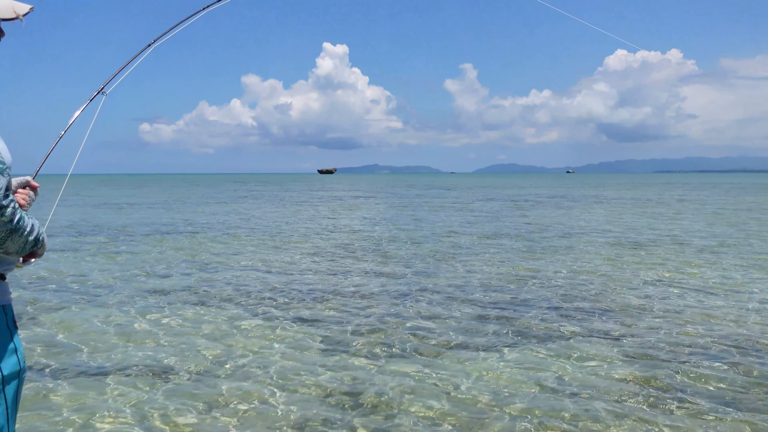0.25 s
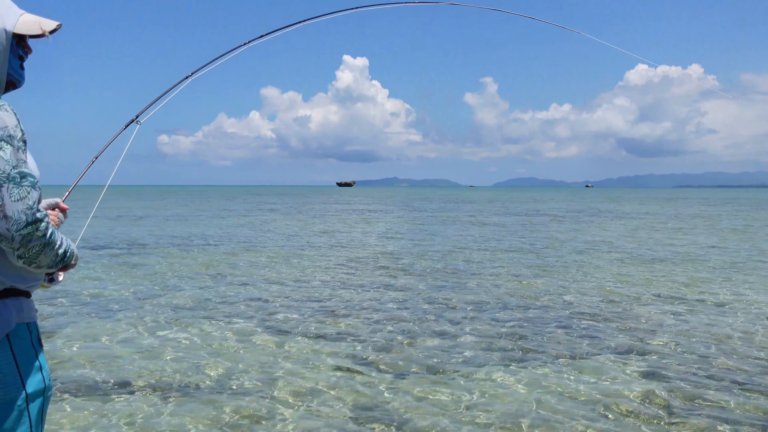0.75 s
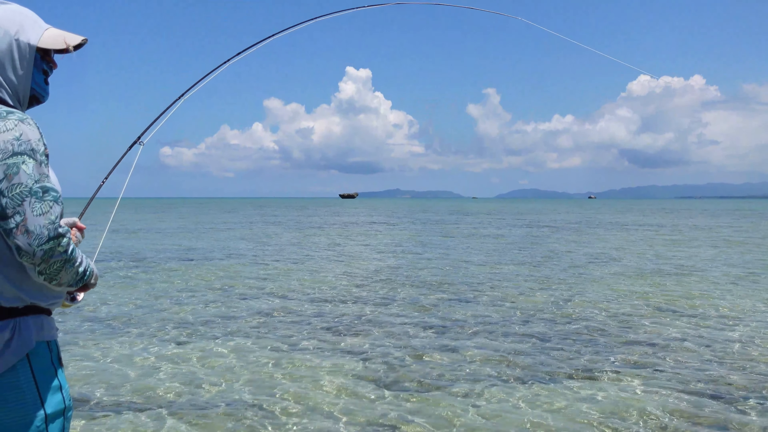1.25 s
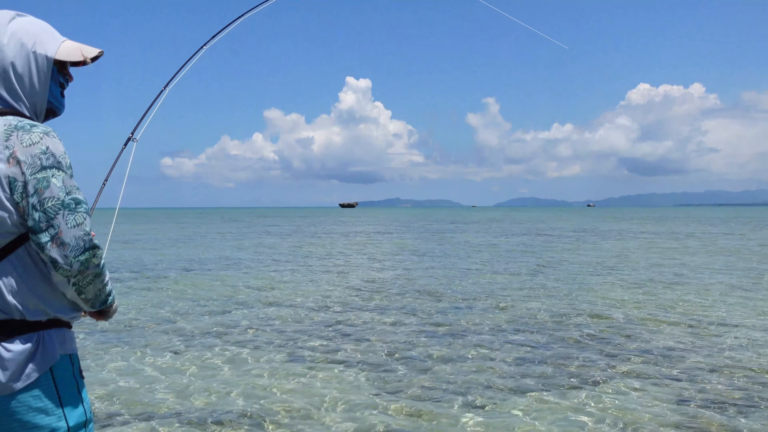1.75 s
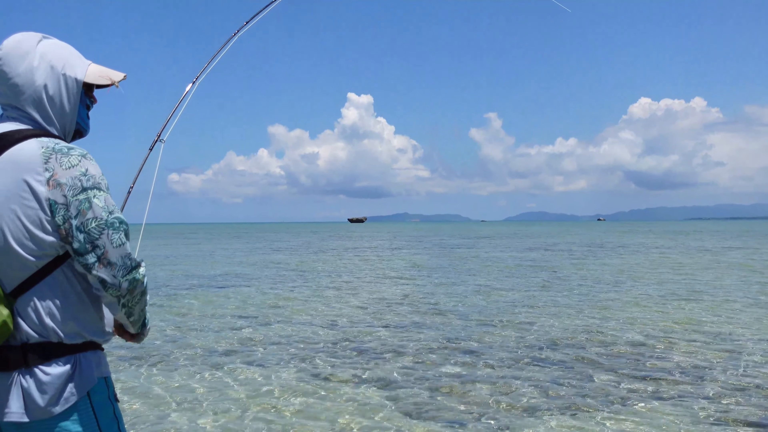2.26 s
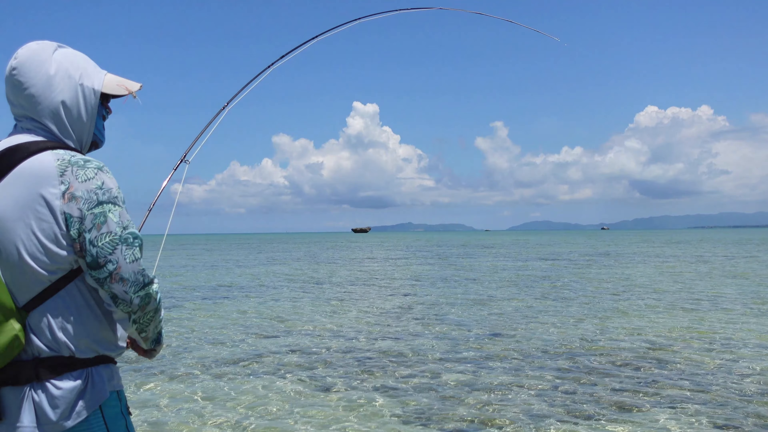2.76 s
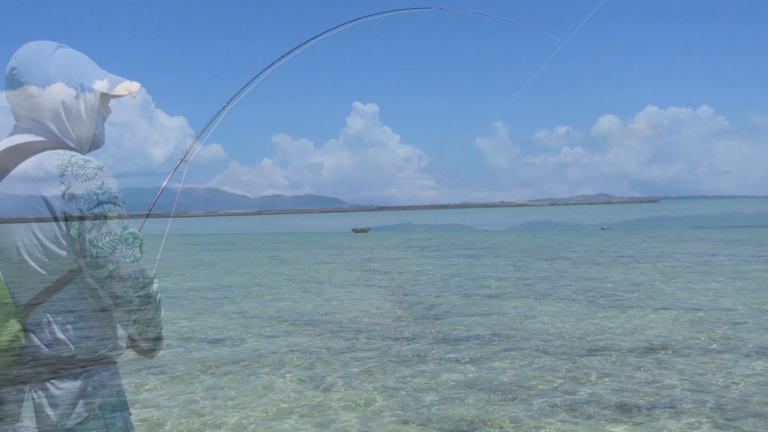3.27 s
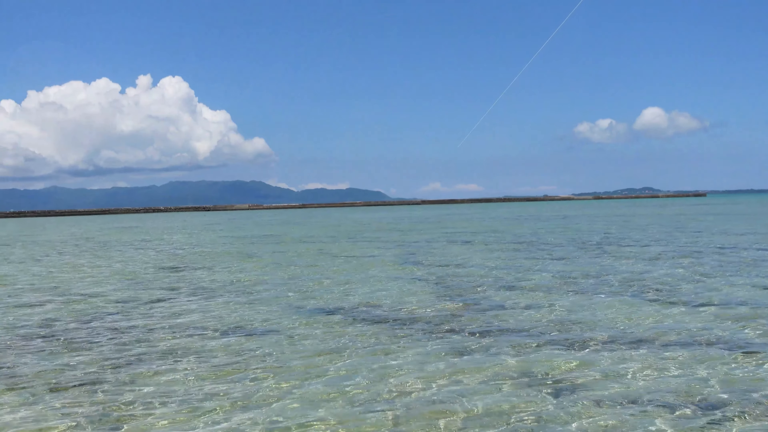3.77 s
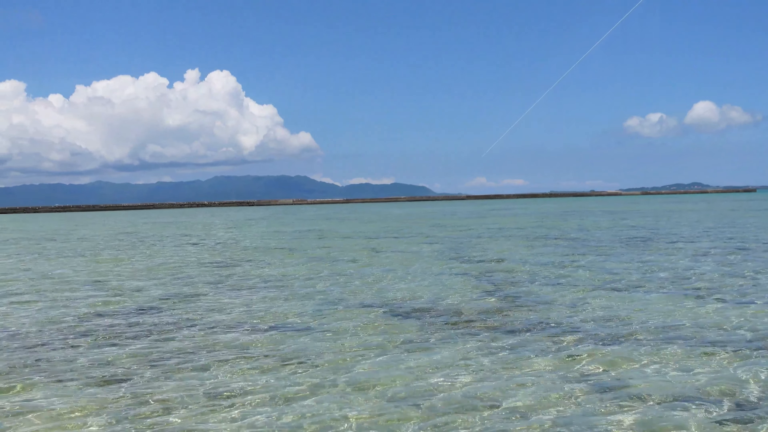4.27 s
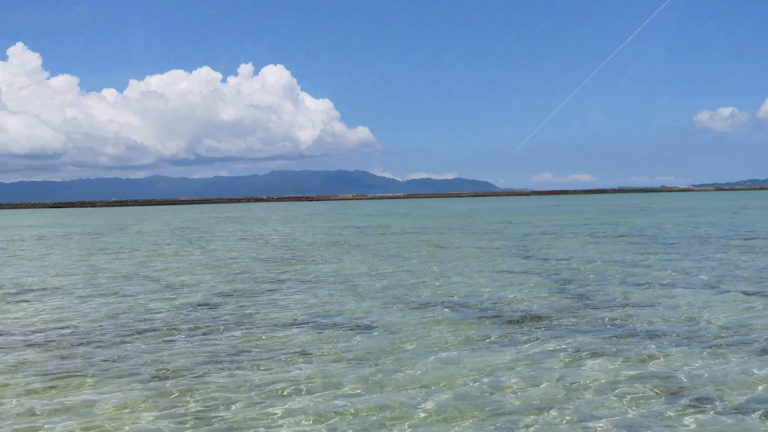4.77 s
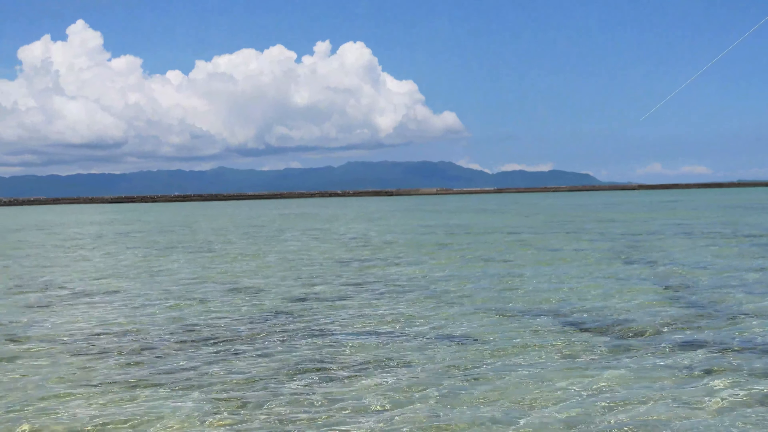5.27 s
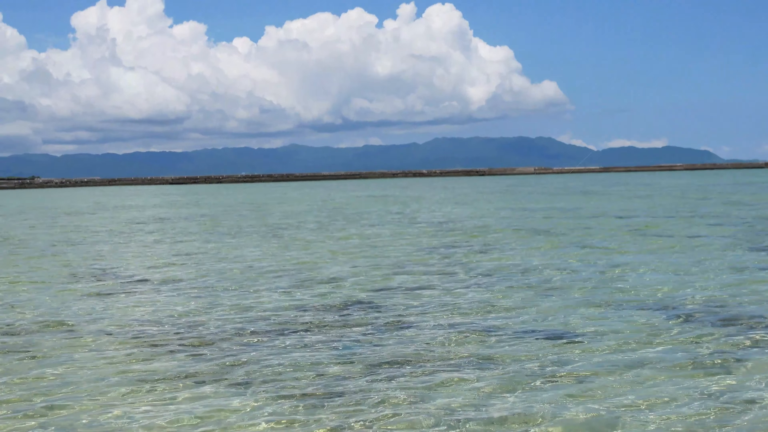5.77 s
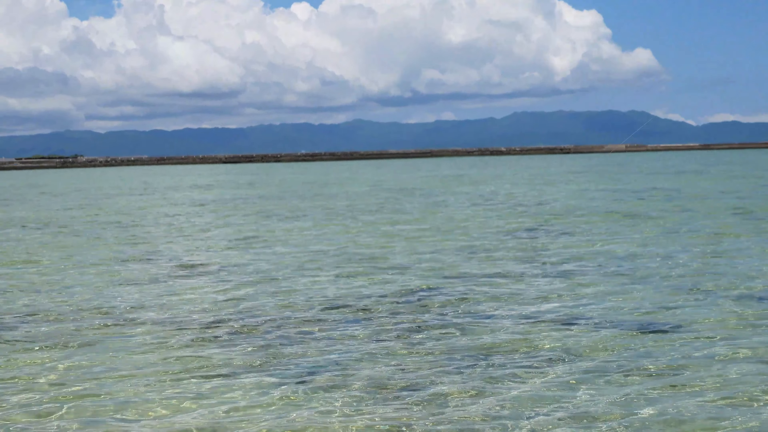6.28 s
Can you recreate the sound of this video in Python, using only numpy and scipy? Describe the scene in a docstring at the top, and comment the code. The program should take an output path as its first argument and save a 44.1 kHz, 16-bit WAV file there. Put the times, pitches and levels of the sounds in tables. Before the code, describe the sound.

Outdoors on a shallow sea flat, a reel clicks and screams in pulsing bursts as line is pulled out, with soft water hiss and light wind buffeting.

```python
"""A reel's ratchet drag buzzes in surges, first ahead, then on the right, as an angler on a shallow sea flat plays a fish.
Each tug spins the spool up; each tooth makes the pawl chatter and rings the spool and frame, whose colour cycles every turn.
Rippling water and breeze hiss in the camera's housing and spray fizzes; gusts buffet its ports and knocks rattle its plastic.
Single teeth tick by before and between the runs, and two thin whistles waver early on."""
import sys
import numpy as np
from scipy import signal
from scipy.fft import rfft, irfft, next_fast_len
from scipy.io import wavfile
from scipy.ndimage import map_coordinates

SR = 44100
rng = np.random.default_rng(int(sys.argv[2]) if len(sys.argv) > 2 else 0)


def store_pcm(level_fs):
    """Save levels as 16-bit WAV."""
    pcm = np.round(np.clip(level_fs, -1, 1) * 32767).astype(np.int16)
    wavfile.write(sys.argv[1], SR, np.atleast_2d(pcm).T)


N = 287973  # length of the scene in samples
SIZE = 2048  # length of one short blow in samples
JERK, FIRST_RUN, SECOND_RUN = (1.659, 1.795), (1.865, 2.706), (3.771, 6.52)  # when the drag slips: start, end [s]

# reel resonances heard from ahead: (centre [Hz], width [Hz], level [dB])
REEL_AHEAD = [(1616, 700, -5.5), (2850, 790, -6), (4035, 370, 0), (4500, 1360, -6), (5895, 490, 4),
              (6160, 120, -17), (7020, 820, -4.5), (8550, 510, -4.5), (10500, 350, -13), (13000, 320, -12),
              (13600, 350, -12), (7100, 6600, -8.5)]
# reel resonances heard from the side: (centre [Hz], width [Hz], level [dB])
REEL_ASIDE = [(1550, 313, -3.5), (2796, 310, -2.5), (2200, 450, -14), (3520, 340, -14), (4306, 370, -6.5),
              (5050, 370, -11), (5800, 190, -6.5), (6840, 170, -8), (7780, 820, -8.5), (8670, 1660, -5.5),
              (10650, 880, -15), (6200, 8800, -15)]


def amp(db):
    """Decibels to gain."""
    return 10 ** (np.asarray(db) / 20)


def unit(x):
    """Scale to rms 1."""
    return x / np.sqrt(np.mean(x ** 2) + 1e-20)


def along(points, hz):
    """Read (Hz, value) points on a log frequency axis."""
    f, v = np.transpose(points)
    return np.interp(np.log(hz + 1), np.log(f + 1), v)


def at(rows, t):
    """Read each column of a curve at the times t."""
    s, *cols = np.transpose(rows)
    return [np.interp(t, s, c) for c in cols]


def wobble(rate):
    """A smooth random curve with rate knots a second."""
    knots = rng.standard_normal(int(N * rate / SR) + 4)
    return map_coordinates(knots, [np.arange(N) * rate / SR])


def swell(t, centre, length):
    """A smooth rise and fall that peaks at 1; length spans the points where it is down to 1/e."""
    return np.exp(-(2 * (t - centre) / length) ** 2)


def swells(rows):
    """Gain over time of summed (centre s, length s, peak dB) swells."""
    t = np.arange(N) / SR
    return sum(amp(db) * swell(t, s, length) for s, length, db in rows)


def filtered(x, response):
    """Multiply the spectrum of x by a response of frequency."""
    m = next_fast_len(N + SR // 2)
    return irfft(rfft(x, m) * response(np.fft.rfftfreq(m, 1 / SR)), m)[..., :N]


def rush(spectrum, alike):
    """Coloured stereo noise whose mid has rms 1; a mid-side balance sets the left-right likeness."""
    def mid_side_response(hz):
        turn = np.arccos(np.clip(along(alike, hz), -1, 1)) / 2
        return amp(along(spectrum, hz)) * [np.cos(turn), np.sin(turn)]

    mid, side = filtered(rng.standard_normal((2, N)), mid_side_response)
    return np.array([mid + side, mid - side]) / np.sqrt(np.mean(mid ** 2))


def resonances(modes, hz):
    """Power response of damped (Hz, width, dB) modes."""
    return sum((amp(db) * hz * w) ** 2 / ((c * c - hz * hz) ** 2 + (hz * w) ** 2) for c, w, db in modes)


def ring(blows, power):
    """Pass short blows through the causal, minimum-phase filter of a power response."""
    cepstrum = irfft(np.log(power + 1e-12) / 2)
    # fold the cepstrum forward in time
    cepstrum[..., 1:SIZE // 2] *= 2
    cepstrum[..., SIZE // 2 + 1:] = 0
    return irfft(rfft(blows) * np.exp(rfft(cepstrum)))


def place(times, sounds):
    """Sum short stereo sounds (2, events, SIZE) at their times."""
    index = (np.round(times * SR).astype(int)[:, None] + np.arange(SIZE)).ravel()
    return np.array([np.bincount(index, side.ravel(), N)[:N] for side in sounds])


def sea():
    """Ripples and breeze as coloured noise, singing a little in a cavity, with a faint fizz of spray."""
    # water and breeze: (frequency [Hz], density [dB per Hz])
    water_colour = [(59, -31), (100, -21.5), (255, -13.5), (358, -9), (424, -6), (648, -3.5), (818, -7.5),
                    (1170, -2), (1310, 1), (1480, -1.5), (2080, -5.5), (2220, -9.5), (9020, -21.5),
                    (12400, -21.5), (16000, -26)]
    # likeness of the two sides: (frequency [Hz], correlation)
    water_alike = [(60, 0.52), (180, 0.76), (550, 0.55), (1650, 0.48), (4970, 0.62), (15000, 0.77)]
    # spray: (frequency [Hz], density [dB per Hz])
    fizz_colour = [(2500, -46), (4500, -10), (6000, 0), (8000, -10), (10000, -4), (13000, -26),
                   (16000, -10.5)]
    # puffs of spray: (centre [s], length [s], peak level [dB])
    puffs = [(.86, 0.45, -73), (2.81, 0.092, -62), (2.98, 0.51, -71)]
    wash_db, cavity_db = -62.5, -67.5  # middle levels that the wobbles stir
    cavity_modes = [(1460, 125, 0), (1880, 80, -11)]  # (Hz, width Hz, dB)

    wash_level = amp(wash_db + 0.46 * wobble(3.4) + 1.06 * wobble(17))
    wash = wash_level * rush(water_colour, water_alike)
    inside = rush(water_colour, [(1500, 0.97)])
    cavity = unit(filtered(inside, lambda hz: resonances(cavity_modes, hz)))
    flicker = amp(2.8 * wobble(180))
    fizz = swells(puffs) * unit(flicker * rush(fizz_colour, [(6000, 0.64)]))
    return wash + amp(cavity_db + 2.8 * wobble(9)) * cavity + fizz


def wind():
    """Gusts buffet each port in its own lumps of low noise; weaker wind carries less of the deepest bass."""
    # rumble ahead of the gust low-pass: (frequency [Hz], density [dB per Hz])
    rumble_colour = [(15, -48), (25, -15), (50, -1), (87, -3), (165, -2.5), (237, -3.5), (385, -8),
                     (450, 0.5), (580, -14), (990, -120)]
    # gusts, ahead of the port gains: (centre [s], length [s], peak level [dB])
    gusts = [(0.98, 0.13, -73), (1.13, 0.18, -72), (2.58, 0.11, -65.5), (3.3, 1, -78.5),
             (3.95, 0.12, -61.5), (4.04, 0.11, -61.5), (4.35, 0.14, -71), (4.61, 0.078, -62.5),
             (4.69, 0.078, -62), (4.88, 0.12, -60.5), (5.09, 0.1, -63.5), (5.25, 0.081, -63.5),
             (5.38, 0.066, -60), (5.48, 0.024, -54), (5.57, 0.1, -57), (5.65, 0.069, -50.5),
             (5.75, 0.094, -53.5), (5.86, 0.045, -58), (5.95, 0.088, -57.5), (6.15, 0.22, -73.5)]
    lull_db = -82.5  # the steady breeze beneath the gusts, ahead of the port gains
    gust_hz, deep_hz = 350, 70  # low-pass corners
    port_gain = amp([[3], [-1]])  # left, right [dB]

    strength = amp(lull_db) + swells(gusts)
    lumps = amp(2.7 * np.array([wobble(25), wobble(25)]))
    rumble = rush(rumble_colour, [(60, 0.61), (300, 0.69)])
    buffet = unit(lumps * filtered(rumble, lambda hz: 1 / (1 + (hz / gust_hz) ** 4)))
    deep = filtered(buffet, lambda hz: 1 / (1 + (hz / deep_hz) ** 4))
    reach = amp(-7) * (strength / strength.max()) ** 0.35  # gain left in the deep bass
    return strength * port_gain * (buffet + (reach - 1) * deep)


def whistle(curve):
    """A thin sine that wavers in pitch and level, perhaps the line drawing taut."""
    t = np.arange(N) / SR
    hz, db = at(curve, t)
    phase = 2 * np.pi * np.cumsum(hz * (1 + 0.003 * wobble(60))) / SR
    tone = np.sin(phase) * amp(2.3 * wobble(40))
    return amp(db) * unit(tone) * (t > curve[0][0]) * (t < curve[-1][0])


def whistles():
    """Two faint whistles, each following its own pitch curve."""
    # one curve for each whistle: (time [s], pitch [Hz], level [dB])
    curves = [
        [(0.25, 2050, -88), (0.29, 2200, -74), (0.325, 2450, -73), (0.37, 2500, -78), (0.41, 2640, -67),
         (0.44, 2820, -74), (0.465, 2900, -61), (0.495, 3150, -88)],
        [(0.455, 2180, -83), (0.5, 2280, -65), (0.545, 2200, -83)],
    ]
    return sum(whistle(curve) for curve in curves)


def knocks():
    """A clean crack and a brief noisy rattle ring the plastic housing; the hardest blow is the cleanest."""
    # knocks, rebounds and scuffs, ahead of the left-right offset:
    # (time [s], peak level [dB], crack size [amplitude], rattle t60 [s], bass weight [dB])
    blow_rows = [(4.5594, -13.5, 3.3, 0.017, -3.5), (4.562, -30.5, 0.85, 0.018, -10),
                 (4.596, -40.5, .1, 0.098, -3), (4.614, -38.5, 0.46, 0.089, 2.5),
                 (4.648, -40.5, .1, 0.16, 3.5), (4.7575, -27.5, 0.89, .028, 1), (4.766, -32, .3, .015, 2),
                 (4.8428, -26.5, 0.54, .02, 1), (4.8455, -24.5, 0.56, 0.016, 4),
                 (4.8507, -23.5, 1.1, 0.022, -7), (4.856, -29, 0.55, .015, 6), (4.863, -35.5, .3, .03, -3),
                 (4.913, -41, .3, 0.044, 5)]
    # plastic housing: (centre [Hz], width [Hz], level [dB])
    housing_modes = [(460, 100, -11.5), (627, 44, -5.5), (1300, 88, -8.5), (1587, 110, 0), (1890, 190, -2),
                     (2420, 320, -13.5), (2920, 520, -8.5)]
    rattle = 0.1  # noise amplitude at the blow
    low_hz, bass_hz, soft_hz, order = 350, 850, 3400, 10  # bass limit, top of the bass weight, treble limit

    times, db, crack, rattle_t60, bass_db = np.transpose(blow_rows)[:, :, None]
    t, hz = np.arange(SIZE) / SR, np.fft.rfftfreq(SIZE, 1 / SR)
    noise = rng.standard_normal((len(times), SIZE))
    blows = crack * (t == 0) + rattle * noise * amp(-60 * t / rattle_t60)
    weight = amp(bass_db / (1 + (hz / bass_hz) ** order)) ** 2
    limits = 1 + (hz / soft_hz) ** order + (low_hz / (hz + 1)) ** order
    thuds = ring(blows, weight * resonances(housing_modes, hz) / limits)
    thuds = amp(db) * thuds / np.abs(thuds).max(1, keepdims=True)
    return place(times[:, 0], [thuds * amp(2.0), thuds * amp(-2.0)])


def chatter(count, rise, hold, t60, tail_db, tail_t60, apart, alike, first=0.35):
    """The pawl drops off a tooth: a swarm of tiny impacts swells and dies, and a faint rattle lasts on."""
    t = np.arange(SIZE) / SR
    swarm = np.minimum(first + t / rise, 1) * amp(-60 * np.maximum(t - hold, 0) / t60)
    tail = np.minimum(t / hold, 1) * amp(tail_db - 60 * t / tail_t60)
    shape = np.hypot(swarm, tail)
    # the pawl bounces on each tooth partly as it did on the one before
    noise = rng.standard_normal((2, count, SIZE))
    shared, own = signal.lfilter([np.sqrt(1 - alike ** 2)], [1, -alike], noise, axis=1)
    return np.array([shared + apart * own, shared - apart * own]) * shape / np.linalg.norm(shape)


def reel_power(modes, hz, low_hz=1100, order=8):
    """Steep-sided resonances with dark valleys between them; the small reel radiates no bass."""
    peaks = sum(amp(db) ** 2 * resonances([(centre, width, 0)], hz) ** 2 for centre, width, db in modes)
    return peaks / (1 + (low_hz / (hz + 1)) ** order)


def ticks():
    """Under light load the spool slips by single teeth, coloured first as from ahead, then as from the side."""
    # single teeth slipping past the pawl: (time [s], peak level [dB])
    slips = [(0.374, -43), (.42, -48), (1.514, -44.5), (1.633, -46), (1.829, -34), (1.838, -32),
             (3.525, -51), (3.656, -37)]
    turn_s = 3.2  # when the colour turns to the side
    times, db = np.transpose(slips)
    blows = chatter(len(times), rise=0.0012, hold=0.00067, t60=0.0078, tail_db=-13, tail_t60=0.097,
                    apart=0.27, alike=0)
    hz = np.fft.rfftfreq(SIZE, 1 / SR)

    def colour(modes):
        frame = amp(1.0) ** 2 * reel_power(modes[:2], hz)  # the two low modes, up 1 dB
        return frame + reel_power(modes[2:], hz)

    power = np.where(times[:, None] < turn_s, colour(REEL_AHEAD), colour(REEL_ASIDE))
    top_hz = 7500 * amp(db[:, None] - db.max())  # a softer contact is duller
    clicks = ring(blows, power / (1 + (hz / top_hz) ** 4))
    return place(times, amp(db[:, None]) * clicks / np.abs(clicks).max(axis=(0, 2))[:, None])


def spool_speed(t):
    """Teeth a second: each tug spins the spool up from a steady creep and lets it sink back."""
    # tugs of the fish; overlapping ones add up: (centre [s], length [s], peak speed when alone [teeth/s])
    tugs = [(1.741, 0.085, 190.0), (1.927, 0.12, 71.5), (2.047, 0.091, 99.5), (2.24, 0.172, 109.2),
            (2.423, 0.098, 111.1), (2.521, 0.084, 72.0), (2.629, 0.223, 91.5), (3.799, 0.069, 99.0),
            (3.939, 0.109, 122.4), (4.181, 0.153, 136.4), (4.341, 0.118, 113.7), (4.562, 0.214, 101.2),
            (4.739, 0.159, 107.8), (4.877, 0.129, 92.5), (4.996, 0.145, 94.1), (5.1, 0.211, 92.2),
            (5.318, 0.281, 106.9), (5.479, 0.078, 72.6), (5.658, 0.21, 95.9), (5.883, 0.173, 101.7),
            (6.126, 0.135, 98.7), (6.329, 0.129, 91.8), (6.473, 0.237, 62.9)]
    creep = 35  # teeth a second
    return creep + sum((peak - creep) * swell(t, s, length) for s, length, peak in tugs)


def teeth(run):
    """The moments at which a tooth passes the pawl, from the summed spool speed."""
    t = np.arange(*run, 1 / SR)
    turned = np.cumsum(spool_speed(t)) / SR
    return np.interp(np.arange(turned[-1]), turned, t)


def hiss():
    """Thin noise between the clicks of the long run, growing steeply with spool speed."""
    # thin hiss: (frequency [Hz], density [dB per Hz])
    hiss_colour = [(2000, -40), (4000, 5), (8000, 1), (11000, -2), (13000, -1), (16000, -30)]
    fastest_db, growth = -56.5, 2.3  # level at the fastest spin ahead of the pan, power of the speed
    t = np.arange(N) / SR
    speed = spool_speed(t) * (t > SECOND_RUN[0])
    return amp(fastest_db) * (speed / speed.max()) ** growth * rush(hiss_colour, [(8000, 0.6)])


def spool_rings(rings, times):
    """Centre, width and level of each drifting bright ring as each tooth strikes it."""
    struck = []
    for width, drift in rings:
        hz, db = at(drift, times[:, None])
        struck.append((hz, width, db))
    return struck


def beamed_db(beams, centre, turns):
    """The turning spool beams a resonance at the camera, so it swells and sinks with the spool's angle."""
    _, lobes, depth_db, peak = min(beams, key=lambda row: abs(row[0] - centre))
    return depth_db * np.cos(2 * np.pi * lobes * (turns - peak))


def ratchet(times, click, rattle, modes, rings, beams, frame_hz, rattle_db, rattle_t60,
            frame_tail_db, frame_t60, detune, **pawl):
    """Each tooth strikes bright steel briefly and rattles the duller frame for longer; faster is denser, so louder."""
    teeth_per_turn = 36
    scatter_db, colour_db, uneven_s = 0.91, 1.75, 0.00015  # random spread of level, mode level and timing
    hz, count = np.fft.rfftfreq(SIZE, 1 / SR), len(times)
    steel_db, = at(click, times[:, None])
    frame_db, lift_db = at(rattle, times[:, None])
    turns = np.arange(count)[:, None] / teeth_per_turn

    def vary(spread):
        return spread * rng.standard_normal((count, 1))

    def even(clicks):
        """Give the mid of every click the same energy."""
        return clicks / np.linalg.norm(clicks.mean(axis=0), axis=1, keepdims=True)

    beamed = []
    for k, (centre, width, db) in enumerate(modes):
        lift = lift_db * (k == 0)  # only the lowest mode is lifted
        beamed.append((centre, width, db + beamed_db(beams, centre, turns) + lift))
    struck = [(centre * (1 + vary(detune)), width, db + vary(colour_db))
              for centre, width, db in beamed + rings]
    low = reel_power(struck[:2], hz)
    high = reel_power(struck[2:], hz, low_hz=1440, order=6)
    frame_power = low + high / (1 + (hz / frame_hz) ** 6)
    steel = even(ring(chatter(count, tail_db=rattle_db, tail_t60=rattle_t60, **pawl), high))
    frame = even(ring(chatter(count, tail_db=frame_tail_db, tail_t60=frame_t60, **pawl), frame_power))
    clicks = amp(vary(scatter_db)) * (amp(steel_db) * steel + amp(frame_db) * frame)
    return place(times + vary(uneven_s)[:, 0], clicks)


def reel_ahead():
    """The ratchet in a short jerk, then the first run, with the reel in front of the camera."""
    # bright click of one tooth: (time [s], level [dB])
    click_levels = [(1.66, -28), (1.7, -23), (1.75, -16.5), (1.87, -20.5), (1.97, -18.5), (2.06, -17),
                    (2.26, -18.5), (2.34, -21), (2.52, -18), (2.59, -13.5), (2.71, -14.5)]
    # rattle of one tooth in the frame: (time [s], level [dB], lift of the lowest mode [dB])
    frame_levels = [(1.66, -28, 5), (1.75, -22.5, 5), (1.87, -26.5, -1), (2.04, -23.5, -0.5),
                    (2.32, -24, -1), (2.53, -21.5, -0.5), (2.6, -22, -3), (2.71, -23.5, 2)]
    # drifting bright rings of the spool: (width [Hz], curve of (time [s], centre [Hz], level [dB]))
    bright_rings = [ (520, [(1.66, 9600, 1), (1.87, 9480, 0), (2.0, 9640, 10.5), (2.1, 9600, -3.5),
                    (2.28, 9800, 2), (2.42, 9600, -7), (2.56, 9500, 3), (2.65, 9650, 6.5),
                    (2.71, 9660, 10)]), (420, [(1.66, 12700, -11), (1.94, 12900, -1), (2.1, 12550, -3),
                    (2.28, 12500, -4), (2.45, 12400, -13), (2.6, 12500, -6), (2.71, 12600, -2)])]
    # beaming: (resonance [Hz], swells [per turn], depth [dB], angle of a peak [turns])
    spool_beams = [(2875, 1, 1.4, .24), (4015, 2, 1.8, .23), (5910, 1, 3, .58), (8550, 1, 1, .77)]

    def run(times):
        return ratchet(times, click_levels, frame_levels, REEL_AHEAD, spool_rings(bright_rings, times),
                       spool_beams, frame_hz=3380, rattle_db=-21, rattle_t60=0.11,
                       frame_tail_db=-10.5, frame_t60=0.13, detune=0.014,
                       rise=0.0025, hold=0.0013, t60=0.015, apart=0.15, alike=0.4, first=0.23)

    return run(teeth(JERK)) + run(teeth(FIRST_RUN))


def reel_aside():
    """The ratchet in the long run, close on the right: the housing shades the left port, unevenly over pitch."""
    # bright click of one tooth, ahead of the pan: (time [s], level [dB])
    click_levels = [(3.77, -18.5), (3.9, -17.5), (4.01, -11), (4.15, -13), (4.28, -15), (4.4, -9),
                    (4.5, -11), (4.62, -12.5), (5.15, -15), (5.42, -16), (6.02, -20), (6.14, -20),
                    (6.21, -21), (6.29, -18), (6.38, -19.5), (6.5, -14.5)]
    # rattle of one tooth in the frame, ahead of the pan: (time [s], level [dB], lift of the lowest mode [dB])
    frame_levels = [(3.77, -23.5, -0.5), (3.95, -20, -5), (4.06, -24.5, 4), (4.2, -19.5, 0),
                    (4.35, -19.5, -0.5), (4.5, -22.5, 3), (4.72, -18.5, -4), (5.08, -20.5, -1.5),
                    (5.25, -22.5, 0), (5.62, -21.5, -3.5), (5.75, -20, 0.5), (5.9, -21, -1.5),
                    (6.03, -24, -1), (6.21, -19.5, 2), (6.36, -21.5, 0), (6.5, -21, 2.5)]
    # drifting bright rings of the spool: (width [Hz], curve of (time [s], centre [Hz], level [dB]))
    bright_rings = [ (224, [(3.77, 6640, -10), (4.7, 6280, -1.5), (5.1, 6270, -11), (5.3, 6320, 2),
                    (5.5, 6360, -3.5), (5.72, 6460, -1), (5.95, 6540, -5), (6.15, 6130, -5),
                    (6.5, 6330, -4)]), (457, [(3.77, 8400, -16), (4.05, 8100, 5.5), (4.27, 8100, -16),
                    (4.4, 8500, 11), (4.65, 8100, -5.5), (5.02, 7970, 3.5), (5.18, 8300, 7.5),
                    (5.35, 8160, -0.5), (5.53, 7970, 5.5), (5.75, 8440, 1), (5.9, 7970, 3.5),
                    (6.5, 8230, -3)]), (474, [(3.77, 9100, -8), (4.05, 9020, 6.5), (4.25, 9240, -7),
                    (4.42, 9200, 4), (4.68, 9130, -2), (4.87, 8700, 5.5), (5.15, 9000, 1.5),
                    (5.33, 8550, -8), (5.8, 9000, 2.5), (6.05, 8500, 1), (6.3, 9070, 3.5),
                    (6.5, 9300, 7.5)]), (380, [(3.77, 9600, 1), (4.55, 9840, -6), (4.8, 9850, -2),
                    (5.02, 9980, 4.5), (5.35, 10030, -2), (5.65, 9970, 1), (5.95, 10100, -9),
                    (6.5, 9850, -14)]), (3200, [(3.77, 12500, -26), (4.25, 12400, -25), (4.42, 12200, -14),
                    (4.65, 12400, -17), (5.1, 12800, -13), (5.35, 12800, -20), (6.0, 12900, -17),
                    (6.5, 12900, -17)]), (900, [(4.5, 15000, -25), (5.1, 14900, -12), (6.5, 14900, -12)])]
    # beaming: (resonance [Hz], swells [per turn], depth [dB], angle of a peak [turns])
    spool_beams = [(1543, 1, 3.6, .14), (2780, 2, 2.2, .34), (4304, 2, 2.2, .36), (5060, 1, 1.3, .95)]
    # the angler swings the reel round and back: (time [s], share of the swing)
    swing_curve = [(3.77, 0.045), (4.5, 0.045), (4.88, 0.57), (5.4, 0.82), (5.9, 1), (6.2, 0.37),
                   (6.5, 0.02)]
    pan_db, swing_pan_db = -4.5, -1.5  # left minus right ahead of the shade, and its change at full swing
    # (Hz, dB added to the left and taken from the right)
    shade = [(1500, 0.5), (2200, 1.8), (2800, -1.05), (3500, 0.4), (4400, -1.5),
             (6000, -1.4), (7300, -2.0), (9000, -1.34), (12000, 0.1), (15000, 3.0)]

    times = teeth(SECOND_RUN)
    clicks = ratchet(times, click_levels, frame_levels, REEL_ASIDE, spool_rings(bright_rings, times),
                     spool_beams, frame_hz=4470, rattle_db=-22, rattle_t60=0.04,
                     frame_tail_db=-8.5, frame_t60=0.12, detune=0.009,
                     rise=0.002, hold=0.0024, t60=0.012, apart=0.36, alike=0.6, first=0.65)
    left_right = np.array([[1], [-1]])
    swing, = at(swing_curve, np.arange(N) / SR)
    left_minus_right_db = pan_db + swing_pan_db * swing
    shaded = filtered(hiss() + clicks, lambda hz: amp(left_right * along(shade, hz)))
    return shaded * amp(left_right * left_minus_right_db / 2 - 1.44)  # 1.44 dB trim on both sides


def scene():
    """All layers summed dry: open water gives no echo."""
    return sea() + wind() + whistles() + knocks() + ticks() + reel_ahead() + reel_aside()


def record(dry):
    """The level dips briefly just after the first run; nothing is kept above the band limit."""
    # the dip: (start [s], end [s])
    dip = (2.7115, 2.727)
    top_hz = 16100  # band limit
    t = np.arange(N) / SR
    dipped = (t > dip[0]) & (t < dip[1])
    return filtered(dry * np.where(dipped, amp(-27.5), 1), lambda hz: hz < top_hz)


dry = scene()
out = record(dry)
store_pcm(out)
```